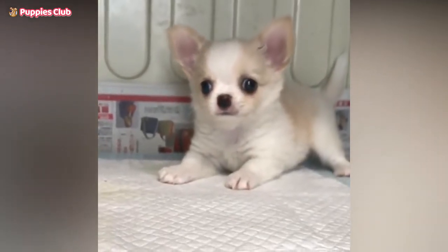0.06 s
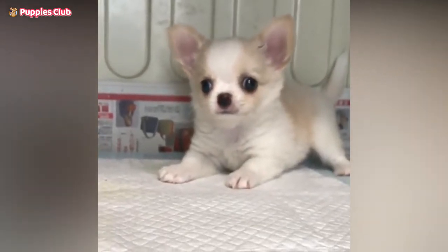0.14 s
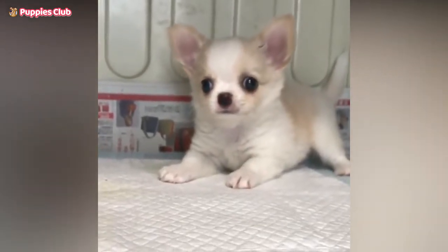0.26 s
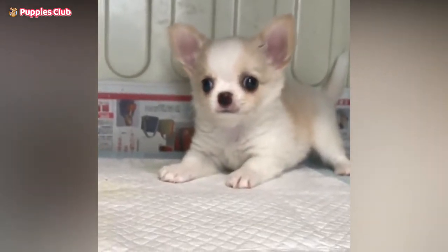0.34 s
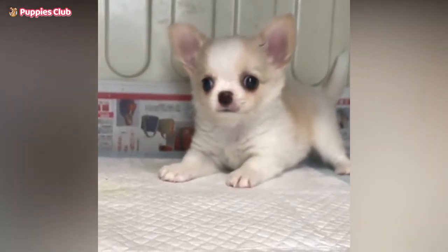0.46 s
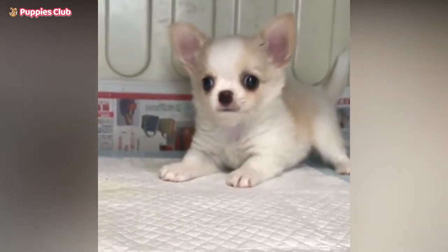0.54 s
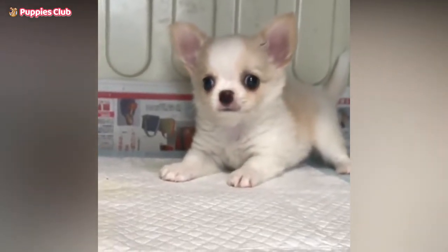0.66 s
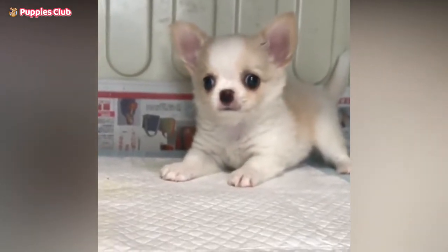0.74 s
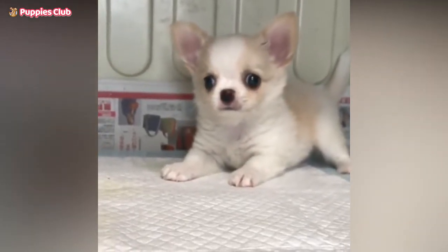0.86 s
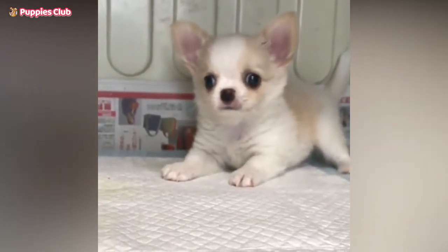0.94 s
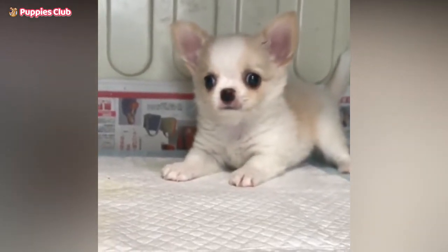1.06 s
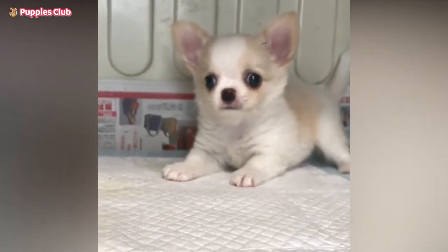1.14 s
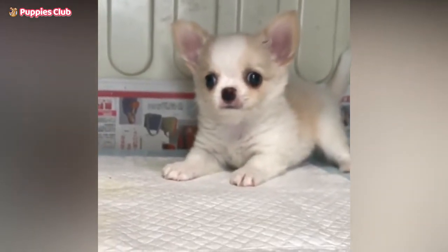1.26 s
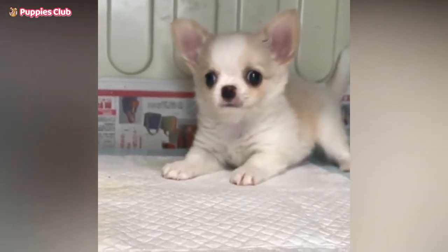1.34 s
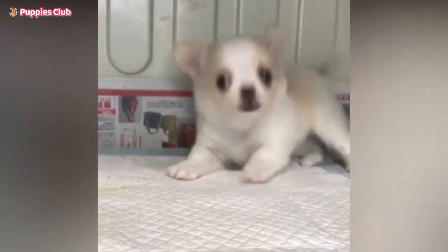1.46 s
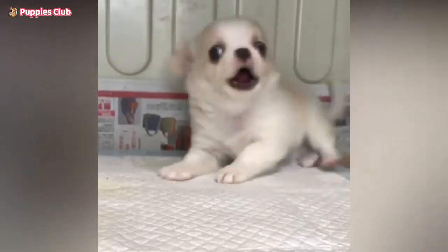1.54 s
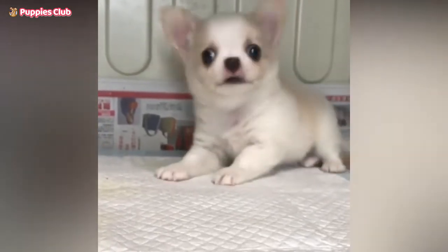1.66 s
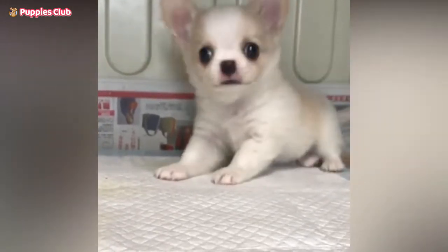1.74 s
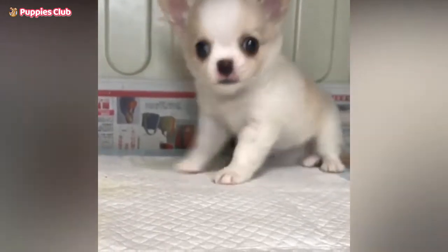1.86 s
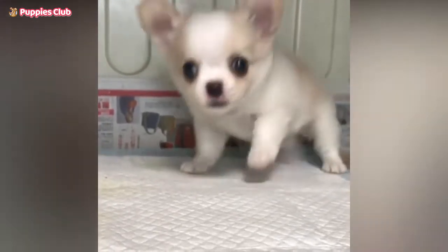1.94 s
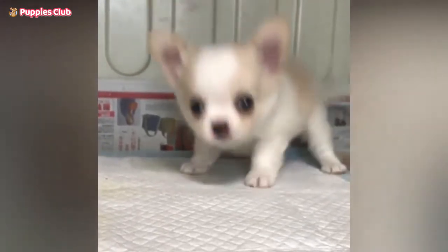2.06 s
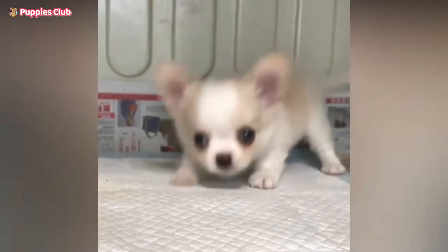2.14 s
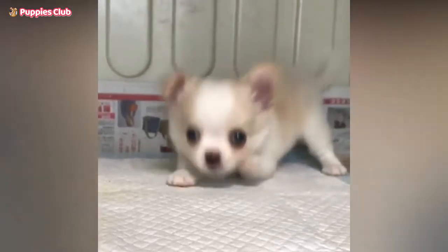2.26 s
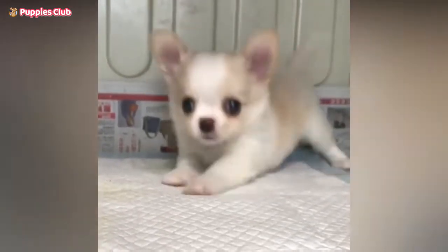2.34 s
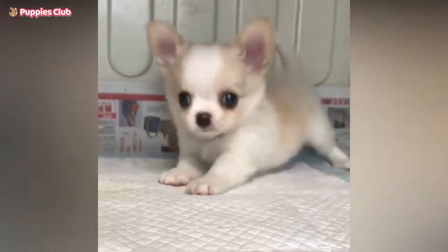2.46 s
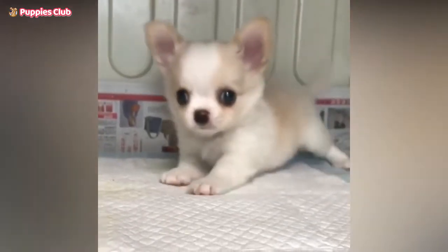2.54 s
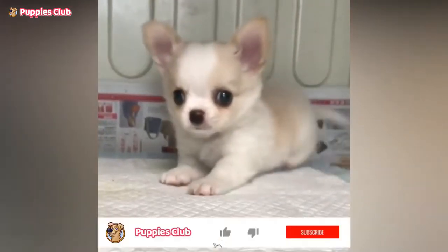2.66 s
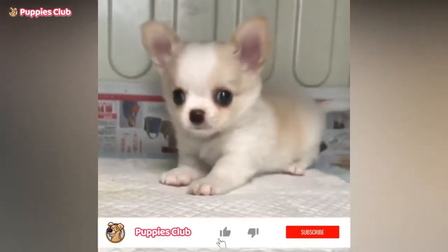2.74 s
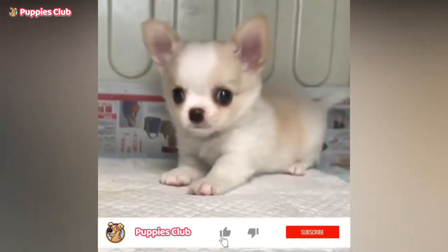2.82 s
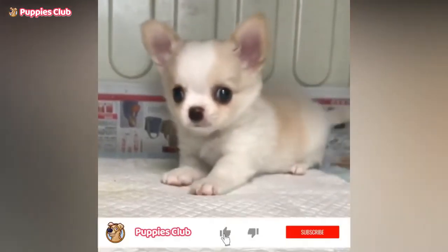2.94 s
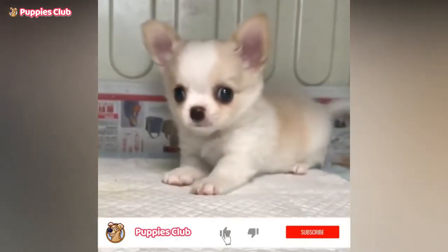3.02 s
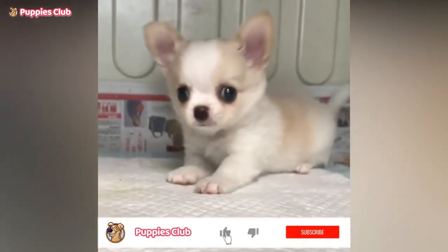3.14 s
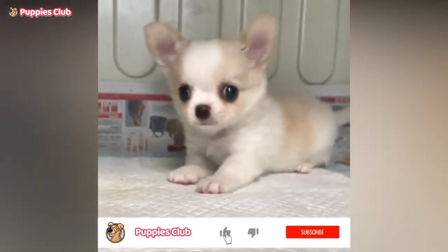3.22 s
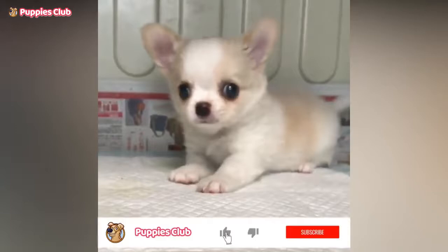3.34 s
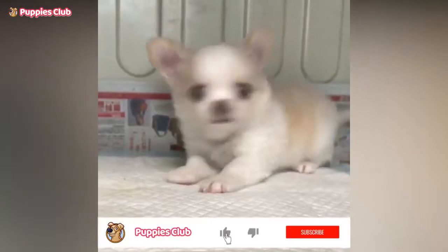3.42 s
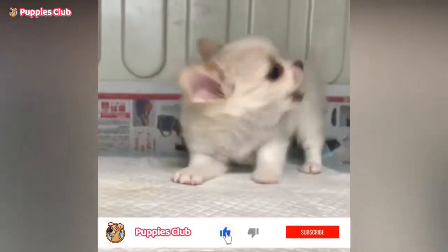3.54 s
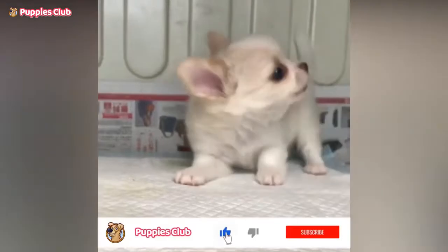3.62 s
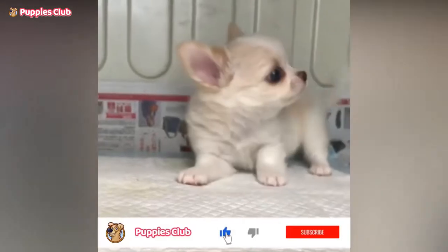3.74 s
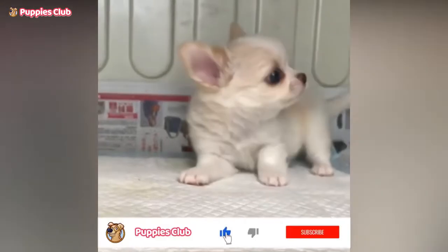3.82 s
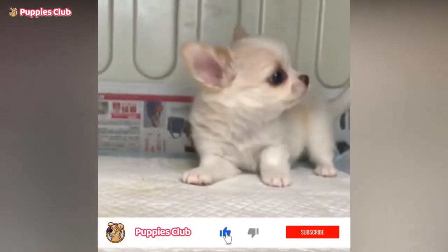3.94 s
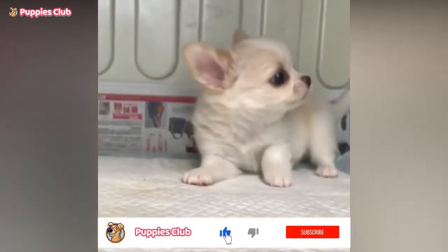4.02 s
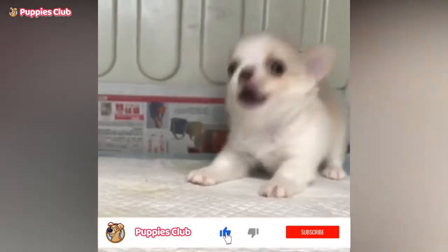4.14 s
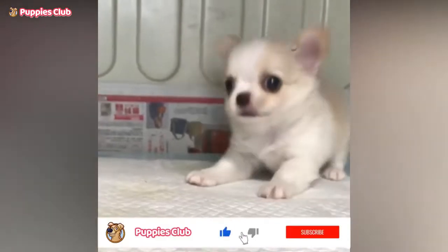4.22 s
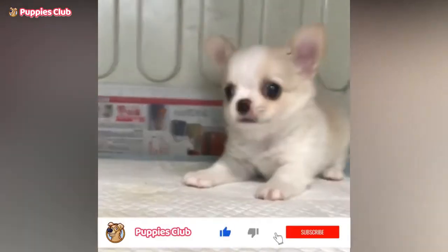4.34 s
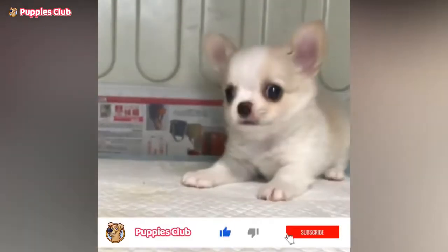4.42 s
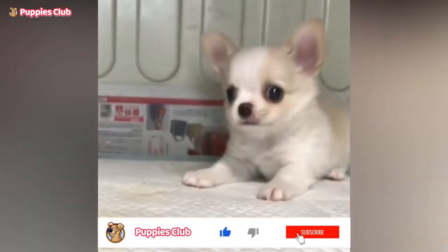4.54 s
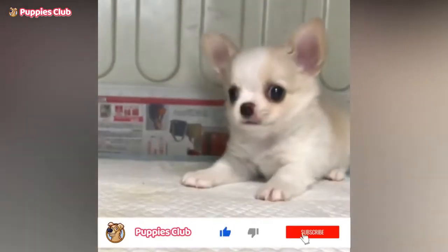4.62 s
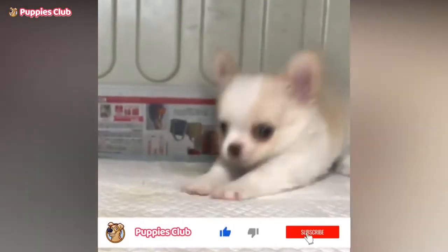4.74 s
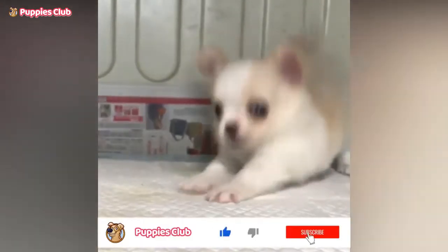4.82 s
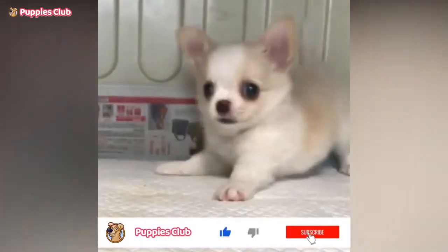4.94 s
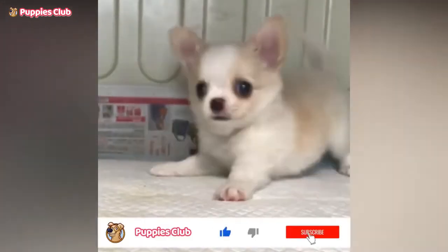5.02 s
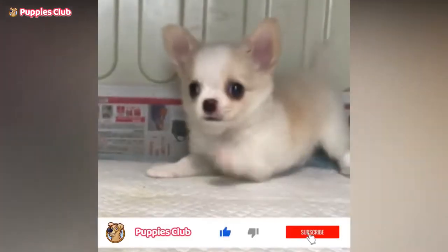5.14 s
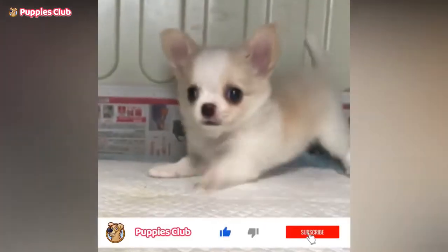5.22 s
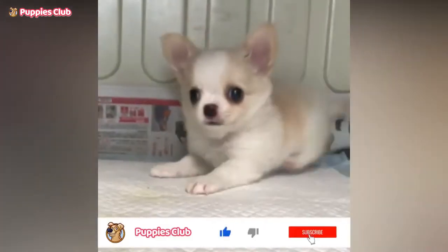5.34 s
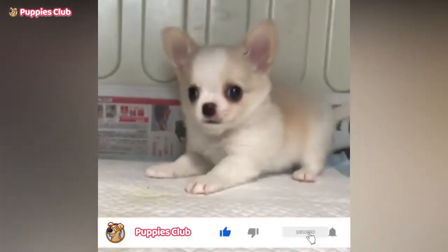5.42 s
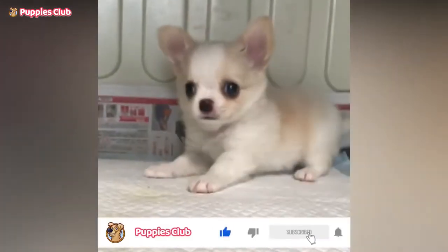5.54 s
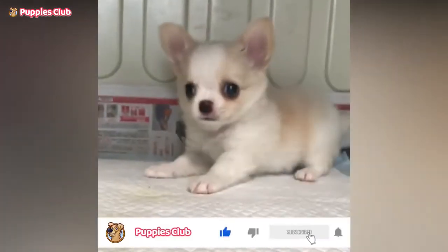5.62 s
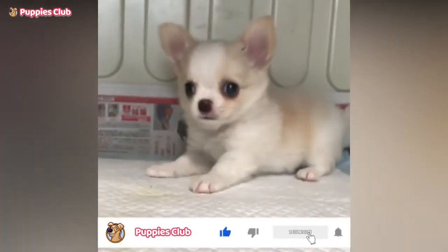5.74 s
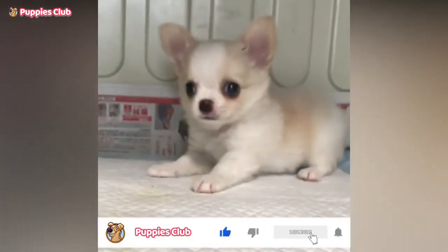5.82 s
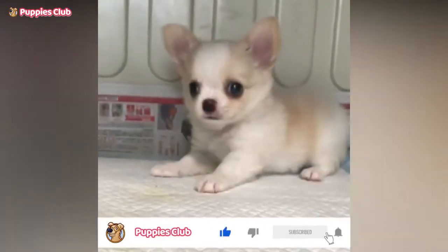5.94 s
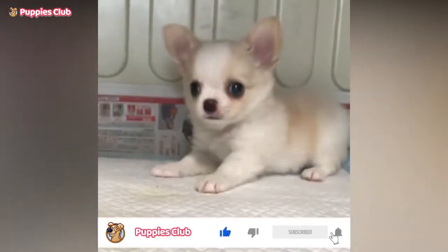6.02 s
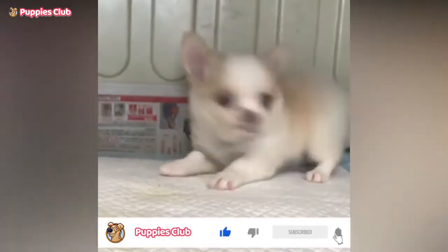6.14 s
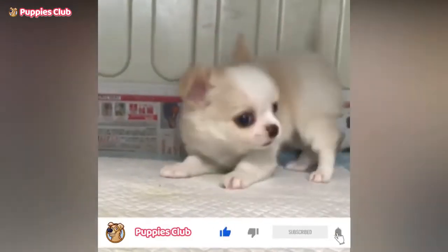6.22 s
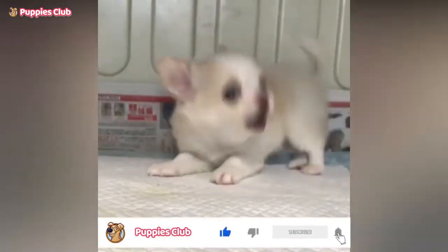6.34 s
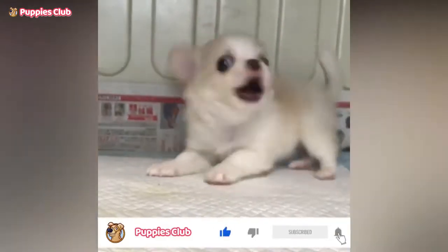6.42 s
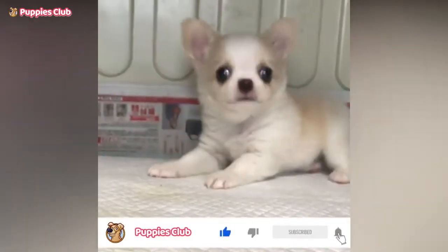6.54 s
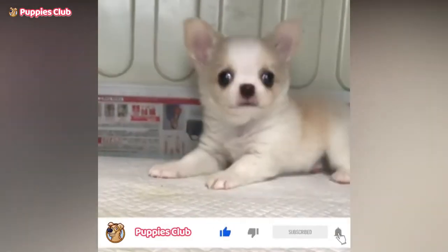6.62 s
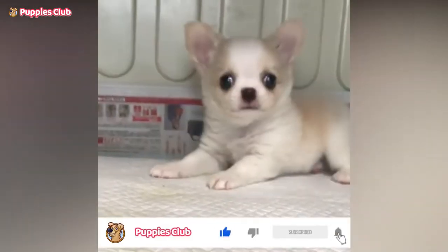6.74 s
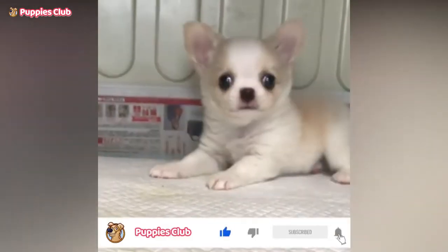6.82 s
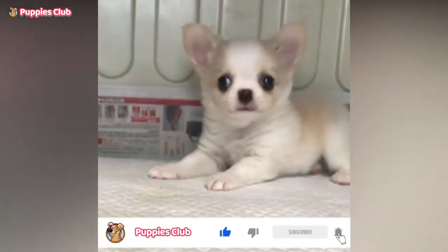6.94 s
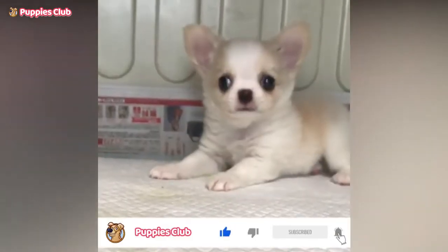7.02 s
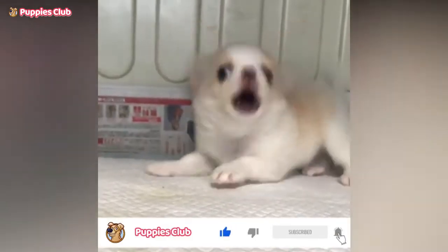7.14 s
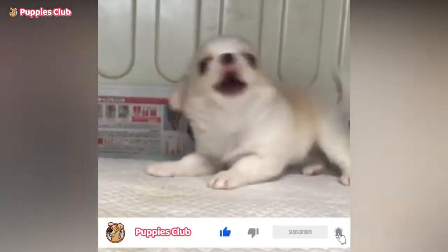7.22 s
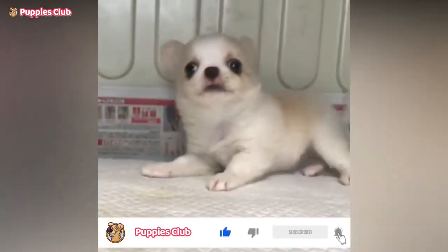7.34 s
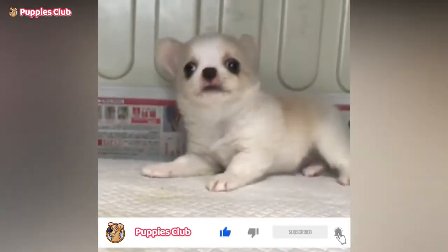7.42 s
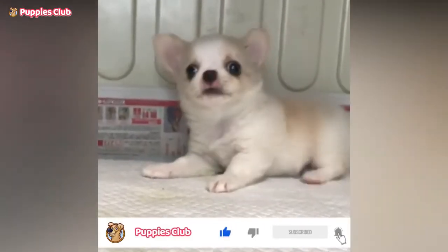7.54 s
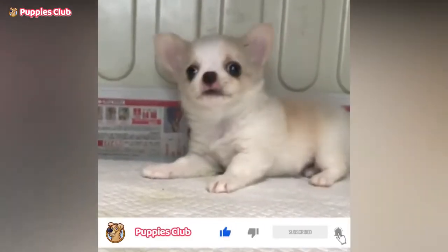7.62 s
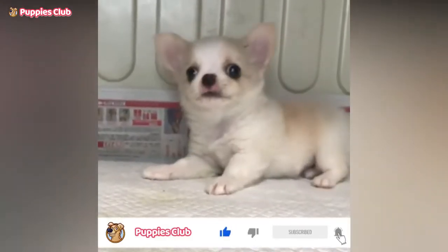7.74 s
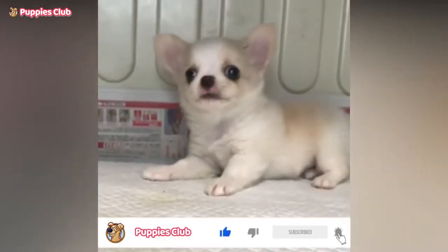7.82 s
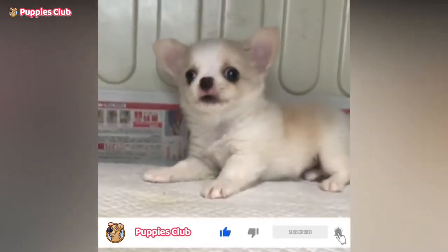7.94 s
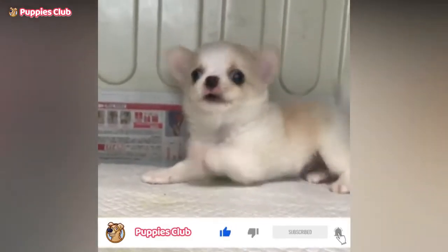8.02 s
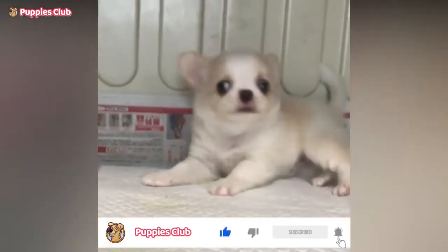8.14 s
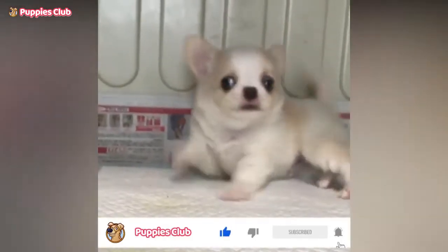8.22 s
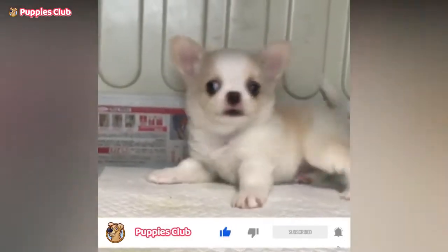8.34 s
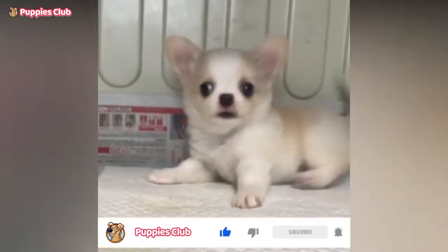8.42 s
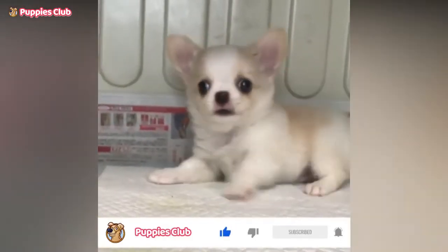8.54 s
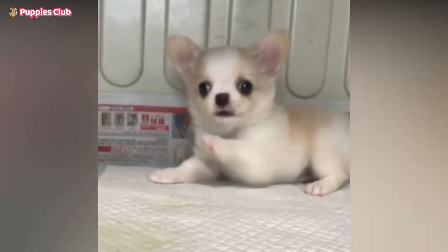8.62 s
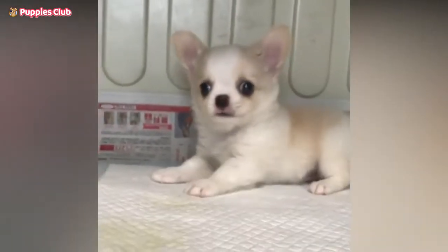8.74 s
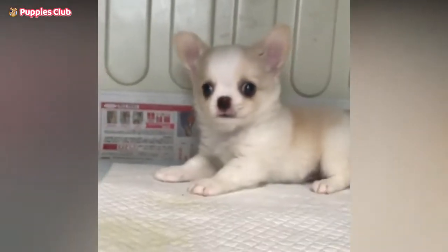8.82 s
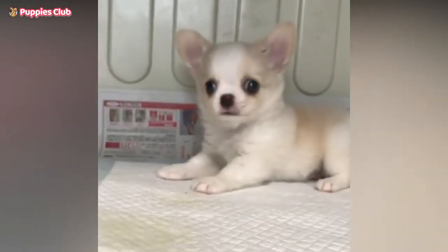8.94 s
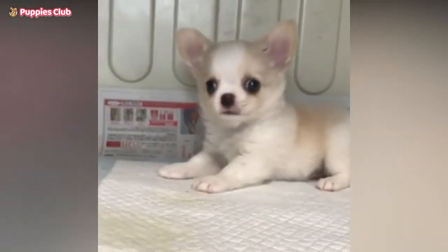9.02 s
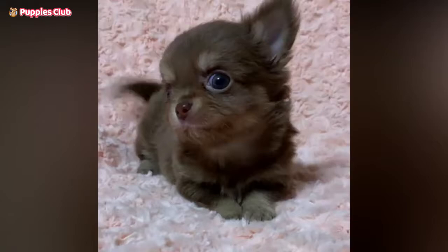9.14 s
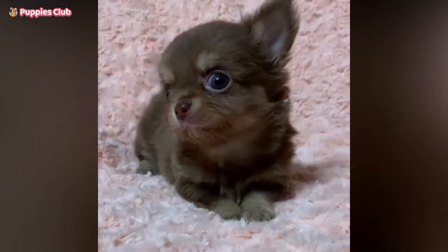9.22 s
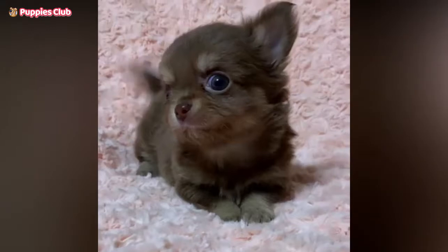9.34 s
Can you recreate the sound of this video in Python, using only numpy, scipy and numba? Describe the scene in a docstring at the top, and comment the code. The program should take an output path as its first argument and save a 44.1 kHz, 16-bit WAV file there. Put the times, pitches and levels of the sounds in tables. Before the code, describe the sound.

A quiet small hard-walled room with faint hush, heard close on a phone. A very soft paw touch at 0.7 s and light scuffing at 1.4 lead to a sharp high yap at 1.7, then a short grunt at 2.2 with rustling, and a solid paw thump at 2.4. A higher, piercing yap comes at 3.7, a lower, rounder one at 4.3. From 4.9 to 5.6 paws get busy: clustered thumps, claw ticks and papery scuffs on a hollow board. After a scuff at 6.3, a rough high yap at 6.5, then the loudest, longer yap at 7.35. At 7.75 low creaky growls crackle with sharp snaps; at 8.1 a whine rises and falls, breaking twice into tiny high squeaks near 8.35, and a growl closes by 8.5. Thumps and scuffs follow, strongest at 8.9, then brief total silence at 9.25 before faint hush and a barely audible tap.

```python
"""In a small hard-walled room with a faint hush, a puppy close to a phone thumps and scuffs a papered board.
It yaps and grunts, then yaps on amid busier paws; after the last yap come low growls with sharp snaps,
a rising and falling whine with two brief breaks to a much higher pitch, a closing growl, late thumps and
a brief silence. Voice: vocal-fold pulses and breath through sliding resonances. Paws: noise bursts and
decaying sines. Scuffs and hush: band-passed noise. All but the hush gets near echoes and a reverb tail."""
import sys
import numpy as np
from scipy import signal
from scipy.io import wavfile
from scipy.ndimage import uniform_filter1d, minimum_filter1d
from numba import njit

SR = 44100
rng = np.random.default_rng(int(sys.argv[2]) if len(sys.argv) > 2 else 0)


def int16_out(signal):
    """Quantize to a 16-bit WAV file."""
    q = np.round(np.clip(np.atleast_2d(signal).T, -1, 1) * 32767)
    wavfile.write(sys.argv[1], SR, q.astype(np.int16))


N = 413292

SILENCE_START_S, SILENCE_END_S = 9.253, 9.343
# treble of the hush: resting level, and its rise with the loudest sound of the last moment
HUSH_TREBLE_DB, RISE_DB, RISE_FROM_DB, RISE_FULL_DB, RISE_HOLD_S = -73, 10, -39, -16, 0.413
ROOM_T60_S, ROOM_DB = 0.37, -21.5  # decay of the duller part; energy of the whole tail beside the direct sound
TOP_HZ = 14150  # nothing is kept above this

LINES_TOP_HZ = 10370  # overtones of the voice stop here; hiss alone above
# that hiss beside the treble level, strongest at the start of a call; width is for each filter pass
AIR_DB, AIR_FADE_DB_PER_S, AIR_HZ, AIR_WIDTH_HZ = -28.5, 69.5, 11800, 2200
SWELL_RASP = 0.35  # extra rasp while a call swells
# below its loudest moment a call gets rougher and duller, per dB: (while swelling, while fading)
ROUGH_PER_DB, DULL_DB_PER_DB = (0.004, 0.009), (0.8, 0.26)
SHUT_ROUGH_PER_DB, SHUT_DULL_DB_PER_DB = (0.018, 0.02), (0.9, 1.4)  # mouth nearly shut
SHUT_OPENING = 0.059  # mouth opening in whines and growls, 0-1
GROWL_HZ, GROWL_ROUGH, GROWL_TREBLE_DB = 164, 0.45, -4.5


def undb(db):
    """Gain of a level in dB."""
    return 10 ** (np.asarray(db) / 20)


def unit(x):
    """Scaled to rms 1."""
    return x / np.sqrt(np.mean(x ** 2))


@njit
def svf(x, hz, width):
    """State-variable band-pass with moving centre and width, gain 1 at the centre."""
    y, b, l = np.empty(len(x)), 0., 0.  # output, band state, low state
    for i in range(len(x)):
        g, k = np.tan(np.pi * hz[i] / SR), width[i] / hz[i]
        v = (b + g * (x[i] - l)) / (1 + g * (g + k))
        b, l, y[i] = 2 * v - b, l + 2 * g * v, k * v
    return y


def band(x, hz, width):
    """Steep band-pass: the filter applied twice, each pass with the given width."""
    hz, width = hz + np.zeros(len(x)), width + np.zeros(len(x))
    return svf(svf(x, hz, width), hz, width)


def walk(count, rate):
    """Smooth random wander, about rate turns a second, rms 1."""
    k = max(int(SR / rate), 1)
    return unit(uniform_filter1d(uniform_filter1d(rng.standard_normal(count), k), k))


def add(out, s, x):
    """Mixes x into out from time s."""
    i = int(s * SR)
    out[i:i + len(x)] += x[:len(out) - i]


def hush(near):
    """Noise bands half an octave apart that flicker; the bass swells slowly, the treble rises after loud sounds."""
    # spectrum of the hush, bass and treble later levelled apart: centre_hz, level_db_per_hz
    spectrum = [(15, -43), (25, -15), (65, 0.5), (155, -6), (192, -18), (237, -11.5), (485, -20.5),
                (966, -26.5), (4730, -36.5), (14000, -39.5)]
    # bass of the hush, higher while the puppy moves about: time_s, level_db
    bass_curve = [(0.0, -63.5), (1.35, -67), (1.78, -61), (2.39, -54), (2.55, -49.5), (3.0, -63.5),
                  (3.72, -54.5), (4.05, -63.5), (4.97, -50), (5.07, -50), (5.43, -49), (5.76, -63),
                  (6.19, -64.5), (6.68, -54), (7.13, -63), (7.44, -56), (9.05, -57), (9.15, -59.5)]
    t = np.arange(N) / SR
    tone_hz, tone_db = np.transpose(spectrum)
    bass, treble = 0, 0
    for hz in 30 * 2 ** np.arange(0, 9.1, 0.5):
        level_db = np.interp(np.log(hz), np.log(tone_hz), tone_db)
        x = band(rng.standard_normal(N), hz, hz / 2) * undb(level_db)
        x *= undb(1.5 * walk(N, 6))  # flicker
        treble_share = np.clip(np.log2(hz / 250) / 2, 0, 1)  # crossover from 250 to 1000 Hz
        bass = bass + (1 - treble_share) * x
        treble = treble + treble_share * x

    # loudest level over the hold time just past, so the rise drops back at once when that runs out
    hold = 2 * int(RISE_HOLD_S * SR / 2)
    loud_db = 10 * np.log10(np.abs(uniform_filter1d(near ** 2, size=441)) + 1e-12)
    padded = np.r_[np.zeros(hold) + 120, -loud_db]
    recent_db = -minimum_filter1d(padded, hold)[hold // 2:][:N]
    rise = np.clip((recent_db - RISE_FROM_DB) / (RISE_FULL_DB - RISE_FROM_DB), 0, 1)
    rise = uniform_filter1d(rise, size=441)
    bass_db = np.interp(t, *np.transpose(bass_curve))
    return unit(bass) * undb(bass_db) + unit(treble) * undb(HUSH_TREBLE_DB + RISE_DB * rise)


def room(x):
    """A few near echoes, then dense decaying reflections, duller as they fade."""
    # first echoes from the board and the near wall: delay_s, level_db
    first_echoes = [(.0011, -15.5), (.0034, -13), (.0071, -13), (0.0113, -11.5)]
    t = np.arange(int(0.7 * SR)) / SR
    noise = rng.standard_normal(len(t))
    dull = band(noise, 1100, 3700)
    dull_tail = dull * 1000 ** (-t / ROOM_T60_S)
    rest_tail = 2.0 * (noise - dull) * 1000 ** (-t / (0.7 * ROOM_T60_S))  # the rest dies sooner
    tail = (dull_tail + rest_tail) * np.clip(t / 0.01, 0, 1)
    response = undb(ROOM_DB) * tail / np.sqrt(np.sum(tail ** 2))
    response[0] = 1  # direct sound
    for s, db in first_echoes:
        response[int(s * SR)] += undb(db)
    return signal.fftconvolve(x, response)[:N]


def scuffs():
    """Fur and paws sliding over the paper: grainy friction noise that swells and fades."""
    # slides: start_s, length_s, level_db (before the grain and swell), centre_hz, width_hz (each filter pass)
    slides = [(1.371, 0.19, -77, 4660, 3990), (1.57, 0.043, -56.5, 900, 705),
              (1.584, 0.075, -48, 3000, 5500), (2.133, 0.088, -58, 3000, 6060),
              (2.214, 0.11, -49, 4000, 9000), (2.495, 0.092, -59.5, 3560, 6980),
              (2.816, 0.037, -62.5, 6000, 9000), (3.616, 0.038, -56, 1500, 1990),
              (4.841, 0.03, -67, 4900, 9080), (4.923, 0.052, -52, 4000, 9000),
              (5.01, 0.063, -48.5, 3240, 3000), (5.298, 0.2, -69.5, 3520, 6000),
              (5.457, 0.054, -58.5, 2500, 3980), (6.336, 0.1, -46, 1970, 5000),
              (8.77, 0.083, -65, 4940, 9020), (8.833, 0.14, -55, 3990, 9020),
              (8.844, 0.054, -44.5, 398, 500)]
    out = np.zeros(N)
    for s, length, db, hz, width in slides:
        n = int(length * SR)
        grains = np.hanning(n) ** 0.7 * undb(3 * walk(n, 300))
        friction = unit(band(rng.standard_normal(n), hz, width))
        add(out, s, undb(db) * grains * friction)
    return out


def paws():
    """A claw tick, a dull slap of the pad and the ring of the board, struck at a new spot each time."""
    # paws landing, gains of the three parts: start_s, claw_tick_db, pad_slap_db, board_thump_db
    landings = [(0.69, -84, -58.5, -64), (1.613, -50, -43, -46), (1.767, -60, -31, -50.5),
                (2.09, -51.5, -50.5, -58), (2.379, -34.5, -28, -33.5), (2.415, -47, -61, -40),
                (2.567, -63, -38.5, -36), (2.819, -49, -63, -60), (3.248, -55, -52, -49),
                (3.545, -48.5, -49.5, -63), (4.346, -60, -30.5, -43.5), (4.556, -39.5, -42, -48.5),
                (4.859, -60.5, -50, -51), (4.918, -49, -34.5, -32.5), (4.959, -30, -23, -49),
                (5.0, -47.5, -31, -42), (5.13, -41.5, -28.5, -40.5), (5.165, -55, -68, -59),
                (5.349, -55, -34, -34.5), (5.447, -32.5, -26, -40), (5.481, -56, -45, -45),
                (5.608, -46.5, -46.5, -56), (5.889, -57.5, -55.5, -64), (6.228, -58.5, -56.5, -64),
                (6.459, -64.5, -50, -47), (7.365, -59, -42, -41), (8.546, -52, -43, -42.5),
                (8.691, -54, -53, -59), (8.731, -60, -59, -67), (8.892, -63, -27.5, -38),
                (9.345, -69.5, -64, -53.5)]
    # modes of the hollow board, before the scatter of each strike: pitch_hz, level_db, t60_s
    modes = [(50, -12, 0.9), (63.6, -7.5, 0.75), (127.8, 1, 0.75), (165, 0.5, 0.4), (210, -7, 0.33),
             (242, -6.5, 0.05), (327, -6, 0.2), (365, -6.5, 0.28), (410, -9.5, 0.27), (570, -9.5, 0.065)]
    out = np.zeros(N)
    t = np.arange(int(0.6 * SR)) / SR
    contact = np.clip(t / 0.0025, 0, 1)
    answer = 1 - np.exp(-t / 0.004)  # the board takes a few milliseconds to answer the soft pad
    for s, tick_db, slap_db, thump_db in landings:
        noise = rng.standard_normal((2, len(t)))
        tick = unit(band(noise[0], 3000, 9000)) * (np.exp(-t / 0.004) + 0.08 * np.exp(-t / 0.015))
        slap = unit(band(noise[1], 350, 750)) * (np.exp(-t / 0.007) + 0.2 * np.exp(-t / 0.04))
        # the new spot shifts the level and pitch of every mode
        spot = rng.standard_normal((len(modes), 2))
        gains, detune = undb(2.5 * spot[:, 0]), 1 + 0.04 * spot[:, 1]
        ring = np.zeros(len(t))
        for (hz, db, t60), gain, shift in zip(modes, gains, detune):
            ring += gain * undb(db) * np.sin(2 * np.pi * hz * shift * t) * 1000 ** (-t / t60)
        strike = contact * (undb(tick_db) * tick + undb(slap_db) * slap)
        add(out, s, strike + answer * undb(thump_db) * ring)
    return out


def throat(source, opening, bite_db=0):
    """Throat and mouth resonances that slide upward as the mouth opens; neighbours alternate in sign."""
    # resonances, mouth shut and open (width for each filter pass, levels before any bite):
    # shut_hz, open_hz, shut_width_hz, open_width_hz, shut_db, open_db
    resonances = [(270, 1500, 420, 2180, -11, -12.5), (1048, 2040, 360, 550, -0.5, 4),
                  (2120, 3100, 310, 2100, -13.5, -19.5), (2740, 4550, 670, 490, -22, -5.5),
                  (3100, 6200, 370, 1600, -22.5, -8.5), (5280, 8600, 2400, 1300, -25, -13),
                  (9000, 9300, 1600, 6700, -33, -25.5)]
    out = 0
    for k, row in enumerate(resonances):
        hz, width, db = (shut + (wide - shut) * opening for shut, wide in np.reshape(row, (3, 2)))
        if k == 3:  # the fourth gives the bite
            db = db + bite_db
        out = out + (-1) ** k * undb(db) * band(source, hz, width)
    return out


def call(treble_db, rough, s, hz, db, opening, rough_per_db, dull_per_db, bite_db=0):
    """Vocal-fold pulses, uneven in time and size when rough, with breath noise, through the throat."""
    t = np.arange(s[0], s[-1], 1 / SR)
    n = len(t)
    # smooth curves of pitch, level and mouth opening
    hz, db, opening = (uniform_filter1d(np.interp(t, s, c + 0 * s), 260, mode="nearest")
                       for c in (hz, db, opening))
    drop = db.max() - db  # dB below the loudest moment
    fading = (t > t[db.argmax()]).astype(int)
    rough = np.clip(rough + np.take(rough_per_db, fading) * drop, 0, 1)
    air_db = AIR_DB + treble_db - AIR_FADE_DB_PER_S * (t - s[0])
    treble_db = treble_db - np.take(dull_per_db, fading) * drop

    # a pulse in the middle of each cycle, from all overtones below the top
    cycles = np.cumsum(hz * (1 + 0.15 * rough * walk(n, 250))) / SR
    k = np.arange(1, int(LINES_TOP_HZ / hz.min()) + 1)[:, None]
    overtone_gain = np.clip((LINES_TOP_HZ - k * hz) / 1000, 0, 1)
    pulses = (np.cos(2 * np.pi * k * (cycles - 0.5)) * overtone_gain).sum(0)
    cycle_db = 4 * rough * rng.standard_normal(n)[cycles.astype(int)]  # one draw for each cycle
    size = undb(cycle_db + 9 * rough * walk(n, 90))
    noise_gain = np.sqrt(7500 / hz)
    breath = 1.5 * rough * noise_gain * rng.standard_normal(n)
    source = size * pulses + breath

    # harder closure adds treble, where turbulence also rasps more
    low = signal.filtfilt(*signal.butter(2, 2800, fs=SR), source)
    rasp_gain = 0.05 + 1.5 * rough + SWELL_RASP * np.clip(drop / 8, 0, 1) * (1 - fading)
    rasp = size * noise_gain * band(rng.standard_normal(n), 7000, 9000) * rasp_gain
    excitation = low + undb(treble_db) * (source - low + rasp)
    voice = throat(excitation, np.clip(opening, 0, 1.2), bite_db)
    air = unit(band(rng.standard_normal(n), AIR_HZ, AIR_WIDTH_HZ)) * undb(air_db)

    # level the voice by its running rms, so that the level curve sets the loudness
    strength = np.sqrt(uniform_filter1d(voice ** 2, 1000, mode="reflect"))
    edge = np.clip(np.minimum((t - s[0]) / 0.0012, (s[-1] - t) / 0.0024), 0, 1)
    return (voice / strength + air) * undb(db) * edge


def snaps():
    """Lone strong vocal-fold snaps inside the growl: a short pulse rings the shut mouth."""
    # snaps: start_s, peak_db
    snap_list = [(7.798, -44), (7.813, -30.5), (7.845, -32.5), (7.852, -31), (7.87, -33.5), (7.905, -32),
                 (7.938, -31), (7.982, -34.5), (7.998, -35), (8.073, -31.5), (8.098, -28)]
    out = np.zeros(N)
    snap = throat(np.r_[np.hanning(12), np.zeros(800)], np.zeros(812))
    snap = snap / np.abs(snap).max()
    for s, db in snap_list:
        add(out, s, undb(db) * snap)
    return out


def growls():
    """Low creaky calls before the whine, rough pulses at one pitch, each fading from its start."""
    # growls: start_s, length_s, level_db, fade_db (change by the end)
    growl_list = [(7.752, 0.21, -50, -3.5), (7.98, 0.039, -44, -19), (8.028, .038, -50, -7),
                  (8.071, .022, -47, -4)]
    out = np.zeros(N)
    for s, length, db, fade_db in growl_list:
        span, level_db = np.array([0, length]), np.array([db, db + fade_db])
        growl = call(GROWL_TREBLE_DB, GROWL_ROUGH, span, GROWL_HZ, level_db,
                     SHUT_OPENING, SHUT_ROUGH_PER_DB, SHUT_DULL_DB_PER_DB)
        add(out, s, growl)
    return out


def whines():
    """Calls through the nearly shut mouth, which keeps the resonances low and still."""
    # a grunt, the whine that rises and falls, two brief breaks up to a much higher pitch, a closing growl:
    # treble_db, roughness_0_1 (both at the loudest moment), curve of (time_s, pitch_hz, level_db)
    whine_list = [ (-4, .2, [(2.216, 533, -35.5), (2.223, 479, -29.5), (2.239, 438, -22.5),
                  (2.25, 433, -41), (2.28, 437, -50)]), (1.5, 0.036, [(8.085, 247.5, -46.5),
                  (8.125, 273.8, -40), (8.16, 330.7, -33), (8.198, 387, -30.5), (8.21, 416, -24),
                  (8.228, 483, -22), (8.242, 553, -19), (8.262, 552, -18), (8.28, 482, -23.5),
                  (8.295, 425, -27), (8.305, 420, -33.5), (8.335, 402, -29), (8.352, 402, -33)]),
                  (-19, .12, [(8.349, 1014, -34), (8.358, 1032, -19.5), (8.362, 1026, -20),
                  (8.367, 1050, -36)]), (-24, 0.088, [(8.368, 1073, -40.5), (8.376, 1073, -32),
                  (8.381, 1085, -26), (8.394, 1090, -20), (8.404, 974, -27)]),
                  (-7, 0.152, [(8.345, 188.3, -43), (8.408, 164, -37.5), (8.45, 180.4, -33),
                  (8.495, 224.6, -38), (8.52, 198.3, -56)]), ]
    out = np.zeros(N)
    for treble_db, rough, curve in whine_list:
        s, hz, db = np.transpose(curve)
        whine = call(treble_db, rough, s, hz, db, SHUT_OPENING, SHUT_ROUGH_PER_DB, SHUT_DULL_DB_PER_DB)
        add(out, s[0], whine)
    return out


def yaps():
    """Short loud calls whose resonances slide as the mouth opens and closes."""
    # yaps: treble_db, bite_db, roughness_0_1 (treble and roughness at the loudest moment),
    # curve of (time_s, pitch_hz, level_db, mouth_opening_0_1)
    yap_list = [ (6, -7, 0.13, [(1.657, 621, -44, 0), (1.673, 666.3, -23, 0), (1.697, 856, -9, 0.78),
                (1.706, 784.5, -11.5, 0.59), (1.717, 857, -9, 0.84), (1.742, 936, -18, 0.92),
                (1.756, 872, -15, 1), (1.77, 719, -21.5, 0.83), (1.79, 573, -38.5, 0.6)]),
                (4.5, 4.5, .08, [(3.654, 520, -25.5, 0), (3.67, 693.4, -18.5, 0.74),
                (3.695, 952, -10, 0.87), (3.712, 1176, -13, 0.98), (3.727, 1471, -14, 0.75),
                (3.74, 1499, -7, .99), (3.757, 1601, -14, 1), (3.772, 1414, -17, 0.92),
                (3.79, 974, -26.5, 0.97), (3.812, 595, -29.5, 0.63)]),
                (4, -8.5, .02, [(4.21, 245, -57, 0.08), (4.262, 391.4, -36, 0.03), (4.285, 553, -27, 0.42),
                (4.305, 665, -16, 1), (4.34, 683.2, -8.5, 1), (4.362, 661, -15.5, .86),
                (4.38, 604, -29, 0.3), (4.398, 516, -29.5, 0.05), (4.42, 461, -48, 0.2)]),
                (6, 1.5, 0.17, [(6.497, 327.6, -36, 0.5), (6.508, 369.8, -43, .1), (6.516, 430, -25, 0.16),
                (6.533, 644, -20, 0.74), (6.553, 928, -12, 0.88), (6.577, 1343, -12.5, 0.78),
                (6.6, 1541, -9.5, 1), (6.616, 1430, -15.5, 1), (6.627, 1047, -11.5, .98),
                (6.641, 730, -27.5, 0.7), (6.658, 503, -41, 0.43)]),
                (5.5, 0, .02, [(7.328, 419.6, -30.5, 0.17), (7.35, 639, -16.5, 0.81),
                (7.362, 787, -15.5, 0.8), (7.39, 1025, -5.5, 0.91), (7.432, 1053, -14.5, 0.85),
                (7.443, 1200, -19, 0.6), (7.46, 1326, -14.5, 0.63), (7.48, 1155, -26, 0.3),
                (7.498, 793, -25, 0.03), (7.506, 714, -34.5, 0.35), (7.525, 532, -26, 0.07),
                (7.547, 426, -49, 0)]), ]
    out = np.zeros(N)
    for treble_db, bite_db, rough, curve in yap_list:
        s, hz, db, opening = np.transpose(curve)
        yap = call(treble_db, rough, s, hz, db, opening, ROUGH_PER_DB, DULL_DB_PER_DB, bite_db)
        add(out, s[0], yap)
    return out


def puppy():
    """The whole voice: snaps, growls, whines and yaps from one throat."""
    return snaps() + growls() + whines() + yaps()


def scene():
    """Everything in the room, with the short silence near the end."""
    t = np.arange(N) / SR
    heard = np.clip(np.maximum(SILENCE_START_S - t, t - SILENCE_END_S) / 0.0061, 0, 1)
    near = scuffs() + paws() + puppy()
    return ((hush(near) + room(near)) * heard)[None]


def record(dry):
    """The phone rounds the peaks, thins the deep bass and cuts the top."""
    rounded = 0.86 * np.tanh(dry / 0.86)
    thin = signal.sosfilt(signal.butter(3, 36, "high", fs=SR, output="sos"), rounded)
    return signal.sosfilt(signal.ellip(12, 0.2, 100, TOP_HZ, fs=SR, output="sos"), thin)


dry = scene()
out = record(dry)
int16_out(out)
```